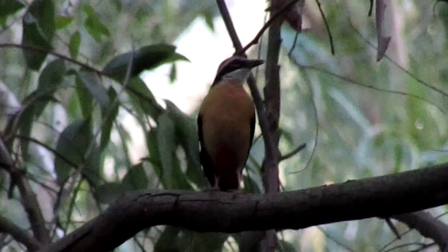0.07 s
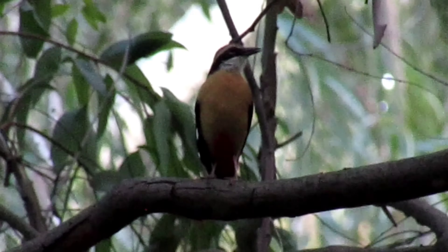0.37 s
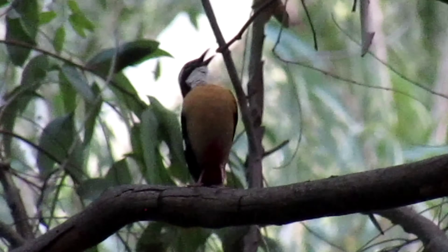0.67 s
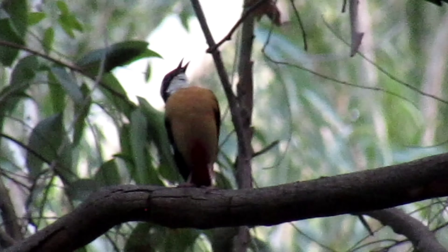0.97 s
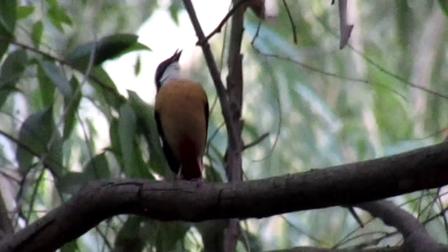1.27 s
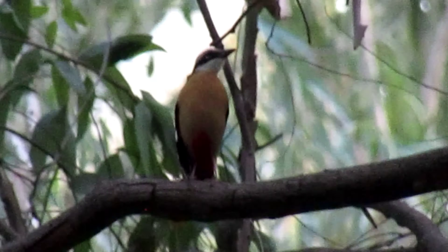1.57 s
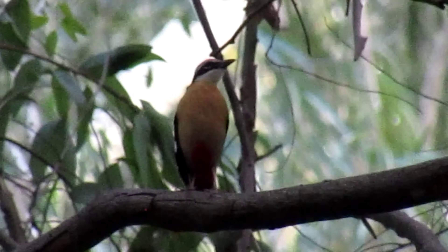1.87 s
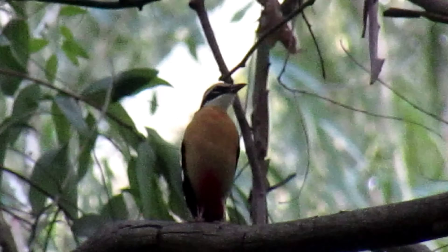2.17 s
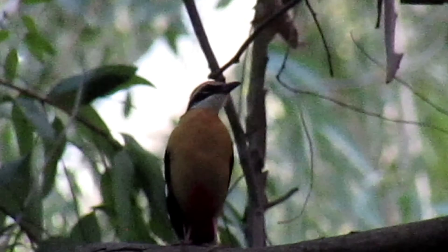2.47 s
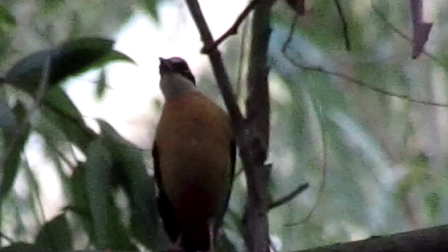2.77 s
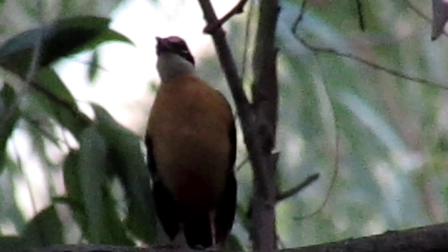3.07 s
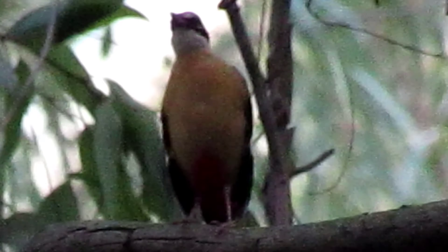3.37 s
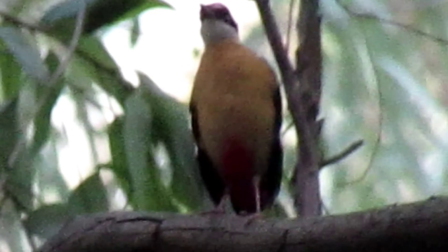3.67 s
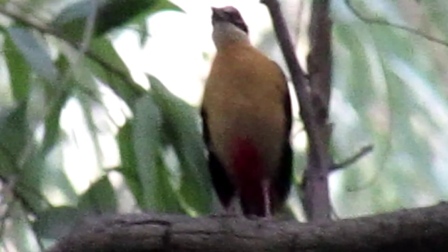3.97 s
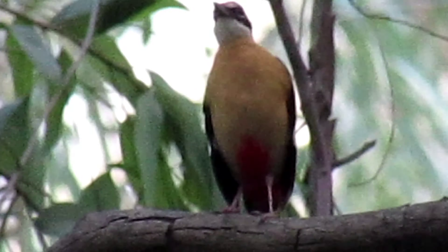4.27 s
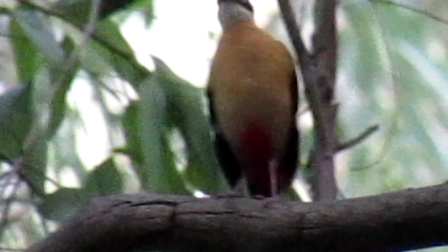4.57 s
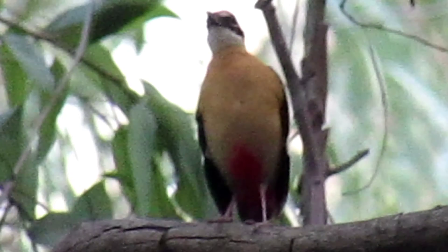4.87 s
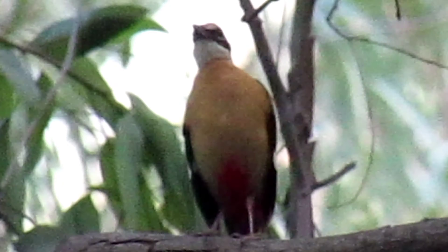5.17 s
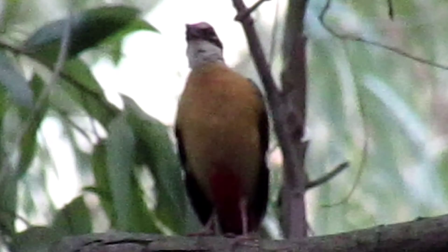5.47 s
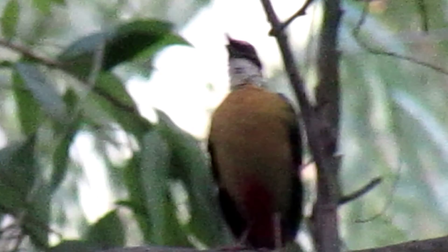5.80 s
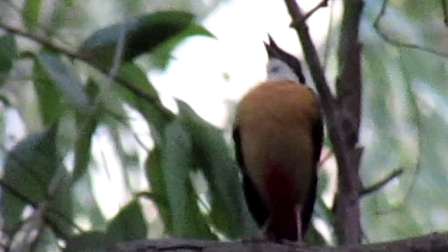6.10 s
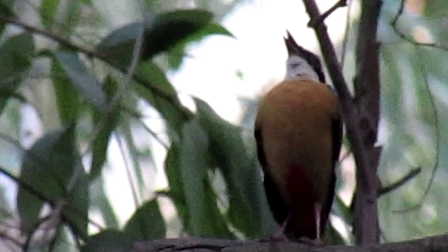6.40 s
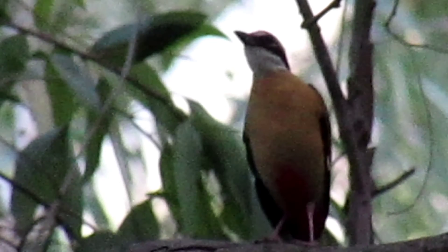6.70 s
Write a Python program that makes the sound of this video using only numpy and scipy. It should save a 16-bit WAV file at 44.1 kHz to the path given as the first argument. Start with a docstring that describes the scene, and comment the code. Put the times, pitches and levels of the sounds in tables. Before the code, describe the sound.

A forest bird whistles a two-note call twice over trilling, chirping crickets, with faint distant birds in between.

```python
"""Crickets trill over a low forest hush, wing file on scraper; slower ones soon chirp along.
A pitta on a branch whistles two calls from its syrinx, each a rising and an arched note, which ring on
among the trees. Between them a second pitta gives the same call from far off, among other birds,
and the hand-held mono camera takes a few light knocks that ring its body."""
import sys
import numpy as np
from scipy import signal
from scipy.fft import rfft
from scipy.io import wavfile
from scipy.ndimage import uniform_filter1d

SR = 44100
rng = np.random.default_rng(int(sys.argv[2]) if len(sys.argv) > 2 else 0)


def master_out(mix):
    """Clip the mix to full scale and print it as 16-bit PCM to the path in sys.argv[1]."""
    frames = np.transpose(np.atleast_2d(mix))
    ceiling = np.clip(frames, -1, 1)
    pcm = np.round(ceiling * 32767).astype(np.int16)
    wavfile.write(sys.argv[1], SR, pcm)


N = 297234
T = np.arange(N) / SR

# Noise spectra. Each row: frequency in Hz, relative density in dB.
HUSH_SPECTRUM = [(20, -10.5), (50, -2.5), (130, 1), (300, 0), (600, -3.5), (1200, -6.5), (2200, -9.5),
                 (4000, -10.5), (7500, -14.5), (8700, -12), (11500, -15.5), (13200, -18), (15000, -14.5)]
INSECT_CHORUS_SPECTRUM = [(3500, -65), (4800, -17.5), (5300, -3.5), (5800, 1.5), (6150, 2.5), (6550, -6.5),
                          (6900, -3.5), (7250, -13), (7700, -11), (9000, -45)]
PITTA_HISS_SPECTRUM = [(2800, -15), (4200, -0.5), (7000, -4), (9000, 8), (10800, -1), (12300, 1.5),
                       (15000, -6)]
CRY_SPECTRUM = [(1400, -28), (1850, -12), (2060, 3), (2350, -9), (3200, -17), (4200, -3), (5000, -2),
                (6500, -30), (8500, -7), (10500, -30)]
# Bouts of the nearest fast cricket. Each row: start in seconds, end in seconds, peak level in dB.
TRILL_BOUTS = [(.008, .09, -41.5), (0.605, .89, -42.5), (1.467, 1.763, -40.5), (2.361, 2.55, -43),
               (3.25, 3.432, -45), (4.106, 4.29, -45), (4.77, 4.971, -43.5), (5.43, 5.717, -42.5),
               (6.212, 6.5, -44)]
# Distant whistles. Each row: start and length in seconds, start and end pitch in Hz, level in dB.
SHORT_WHISTLES = [(0, 0.15, 3155, 3000, -63.5), (0.258, .16, 3880, 3500, -67), (1.14, 0.1, 1167, 1157, -64),
                  (3.505, 0.15, 3830, 3480, -65), (4.9, 0.172, 1686, 1590, -67),
                  (5.05, 0.1, 1118, 1176, -64.5), (5.303, 0.091, 2995, 3020, -53.5)]
# Pitch contours of the near pitta. Each row: time into the note in seconds, pitch in Hz.
RISE_CONTOUR = [(0, 1903), (.025, 2087), (.04, 2357), (.06, 2550), (.09, 2635), (.16, 2756), (.208, 2990),
                (.226, 2919), (.246, 2400)]
ARCH_CONTOUR = [(0, 2430), (.048, 2355), (.059, 2492), (.067, 2906), (.097, 3019), (.132, 2822),
                (.172, 2705), (.186, 2293), (.232, 2203)]
# Its notes. Each row: start in seconds, time stretch, pitch factor, level in dB, overtone gain in dB.
RISING_NOTES = [(.64, 0.97, .995, -32, 5), (5.817, 0.95, 1.005, -32.5, 6.5)]
ARCHED_NOTES = [(1.098, 1.0, .997, -34, 5.9), (6.279, 1.02, 1.0, -33.5, 5.3)]
# Syrinx rasp. Each row: offset from the tone in Hz, relative density in dB.
RASP_SPECTRUM = [(20, 11), (150, 1), (300, -4.5), (500, -15.5), (900, -27), (2000, -58)]
# Throat and open beak as an overtone filter. Each row: frequency in Hz, gain in dB.
BEAK_RESPONSE = [(4400, -39), (4850, -25.5), (5400, -27.5), (6100, -28), (7200, -28), (8100, -20),
                 (8800, -15.5), (9400, -22), (10300, -37), (11000, -30), (11900, -23), (13000, -29.5),
                 (14200, -27.5), (15200, -26.5)]
# Chirps of two slow crickets. Each row: start in seconds, end in seconds.
NEAR_CHIRPS = [(.81, 1.182), (1.965, 2.331), (3.11, 3.435), (4.185, 4.553)]
FAR_CHIRPS = [(.7, 1.05), (2.1, 2.25), (5.1, 5.5), (6.27, 7)]
# Tiny bird chips. Each row: start in seconds, start pitch in Hz, peak level in dB.
BIRD_CHIPS = [(1.774, 11000, -53), (2.165, 10800, -53), (2.352, 11100, -51), (2.82, 6320, -42.5),
              (2.847, 6200, -45), (2.863, 10800, -47.5), (2.88, 11200, -47), (2.972, 11200, -48)]
# Knocks. Each row: start in seconds, level in dB, scrape decay in seconds, low and high edge in Hz.
CAMERA_KNOCKS = [(1.894, -43.5, 0.011, 740, 1730), (2.879, -52, 0.0067, 500, 1500),
                 (3.195, -51, 0.012, 120, 600), (3.864, -42, 0.015, 141, 4150),
                 (3.934, -54, 0.17, 160, 1260), (3.967, -48.5, 0.0067, 400, 4000),
                 (4.016, -48, 0.0035, 403, 2000), (4.084, -53, 0.0045, 1800, 5000)]
# Camera body modes. Each row: frequency in Hz, width in Hz, gain in dB.
BODY_MODES = [(160, 67, 1), (358, 130, 5), (516, 90, -1), (733, 190, 5), (863, 51, 4), (1090, 39, 4),
              (1550, 730, -1.5), (2010, 260, 1), (2650, 380, 1.5), (3990, 500, 0), (4600, 230, -1.5),
              (6400, 3000, -2), (8200, 1500, -6)]
# Far pitta. Each row: start and length in seconds, start and goal pitch in Hz, start level in dB,
# swell in dB per second.
FAR_PITTA_NOTES = [(2.33, 0.28, 1906, 2903, -58.5, 36), (2.944, 0.22, 2938, 2536, -49.5, -12)]


def undb(db):
    return 10 ** (np.asarray(db) / 20)


def unit(x):
    return x / np.sqrt(np.mean(x ** 2))


def ramp(x):
    return np.clip(x, 0, 1)


def db_at(hz, points):
    """Read (Hz, dB) points on a log-frequency axis."""
    f, db = np.transpose(points)
    return np.interp(np.log(np.maximum(hz, 1)), np.log(f), db)


def noise(spectrum):
    """Shaped noise, rms 1."""
    gain = undb(db_at(np.fft.rfftfreq(N, 1 / SR), spectrum))
    return unit(np.fft.irfft(rfft(rng.standard_normal(N)) * gain, N))


def walk(rate_hz):
    """Smooth random wander, rms 1."""
    k = max(int(SR / rate_hz), 1)
    return unit(uniform_filter1d(np.repeat(rng.standard_normal(N // k + 1), k)[:N], k))


def cycles(hz):
    return np.cumsum(hz) / SR


def sine(hz):
    return np.sin(2 * np.pi * cycles(hz))


def gate(start_s, end_s, edge_s):
    return ramp(np.minimum(T - start_s, end_s - T) / edge_s)


def arc(start_s, length_s):
    return np.sin(np.pi * ramp((T - start_s) / length_s))


def forest_echo(x, early_db, late_db, t60_s, early_s=.035):
    """Single returns from near trunks, then a long scatter from foliage."""
    t = T[:int(1.5 * SR)]
    trunks = np.zeros(len(t))
    delays_s = np.linspace(.006, 2 * early_s, num=14) + rng.uniform(0, 0.0045, size=14)
    trunks[(delays_s * SR).astype(int)] = rng.choice([-1, 1], size=14) * np.exp(-delays_s / early_s)
    leaves = rng.standard_normal(len(t)) * undb(-60 * t / t60_s) * (1 - np.exp(-t / 0.017))
    early = undb(early_db) * trunks / np.linalg.norm(trunks)
    late = undb(late_db) * leaves / np.linalg.norm(leaves)
    return signal.fftconvolve(x, early + late)[:N]


def hush(hush_db=-53.5, whine_hz=11793, whine_db=-71):
    """Far air and foliage, microphone hiss and a thin wavering whine."""
    whine = np.sqrt(2) * sine(whine_hz * (1 + 0.00354 * walk(250)))
    air = noise(HUSH_SPECTRUM) * undb(hush_db + 0.093 * walk(1.7))
    return air + whine * undb(whine_db + 2 * walk(30))


def wing_strokes(strokes, hz, fall, duty):
    """Each wing closing draws the file over the scraper: a short falling tone."""
    progress = np.minimum(strokes % 1 / duty, 1)
    return np.abs(np.sin(np.pi * progress)) ** 0.41 * sine(hz * (1 - fall * (progress - .5)))


def cricket_trills(rate_hz=91, pitch_hz=6020, burst_s=0.096, dip=0.82, neighbours_db=-59, chorus_db=-56):
    """One fast cricket trills in bouts of bursts; its neighbours and a far chorus never stop."""
    bouts, neighbours = np.zeros((2, N))
    for start_s, end_s, db in TRILL_BOUTS:
        bursts = 1 - dip * np.cos(np.pi * (T - start_s) / burst_s) ** 2
        bouts += gate(start_s, end_s, 0.016) * undb(db) * bursts
    strokes = cycles(rate_hz * (1 + 0.024 * walk(25)))
    near = bouts * wing_strokes(strokes, pitch_hz * (1 + .006 * walk(90)), fall=.11, duty=0.45)
    for stroke_hz, hz in [(88, 5650), (95, 5900), (100, 6100)]:
        gain = undb(6 * walk(9))
        strokes = cycles(stroke_hz * (1 + .03 * walk(15)))
        neighbours += gain * wing_strokes(strokes, hz * (1 + .015 * walk(60)), fall=.13, duty=.5)
    chorus = noise(INSECT_CHORUS_SPECTRUM) * undb(chorus_db + 2.5 * walk(3.56))
    return near + undb(neighbours_db) * unit(neighbours) + chorus


def short_whistles(drift):
    """Distant birds whistle faint, straight glides."""
    out = np.zeros(N)
    for start_s, length_s, from_hz, to_hz, db in SHORT_WHISTLES:
        hz = np.interp(T, [start_s, start_s + length_s], [from_hz, to_hz])
        out += arc(start_s, length_s) * undb(db) * sine(hz * drift)
    return out


def far_birds():
    """All distant birds; whistles and chips echo among the trees."""
    drift = 1 + 0.00371 * walk(120)
    whistles = short_whistles(drift) + far_pitta(drift) + long_whistle(drift)
    chips = bird_chips()
    return (whistles + chips + hoarse_cry()
            + forest_echo(whistles, early_db=-3.5, late_db=0, t60_s=1.45)
            + forest_echo(chips, early_db=-7, late_db=-12, t60_s=.6))


def note(contour, row, attack_s, release_s, sag_db_per_s, accent_s, accent_db,
         settle_s, break_s, open_s, shut_db, fade_db=25, leap_hz_per_s=25000):
    """Control curves of a note that swells, sags, gets a late push and dies. Times are pre-stretch."""
    start_s, stretch, pitch_factor, level_db, overtone_db = row
    times_s, pitches_hz = np.transpose(contour)
    age_s = np.clip((T - start_s) / stretch, 0, times_s[-1])
    left_s = times_s[-1] - age_s
    sounding = gate(start_s, start_s + times_s[-1] * stretch, .003)
    hz = np.interp(age_s, times_s, pitches_hz)
    fade = ramp(1 - age_s / attack_s) + ramp(1 - left_s / release_s)
    accent = np.exp(-((age_s - accent_s) / 0.01) ** 2)
    db = level_db - fade_db * fade - sag_db_per_s * age_s + accent_db * accent
    # Raspy until the syrinx settles, and again as it breaks off.
    rough = ramp(0.0072 + 0.75 * ramp((settle_s - age_s) / 0.014) + 0.79 * ramp(1 - left_s / break_s))
    # Overtones need a clean, steady tone and an open beak.
    leap = uniform_filter1d(ramp(np.abs(np.gradient(hz)) * SR / leap_hz_per_s) ** 2, size=256)
    bright_db = overtone_db - 9 * rough - 9 * leap + shut_db * ramp(1 - age_s / open_s)
    return sounding, hz * pitch_factor, db, bright_db, rough


def rising_note(row):
    """Starts hard through a half-shut beak, ends on an accent."""
    return note(RISE_CONTOUR, row, attack_s=0.033, release_s=0.0068, sag_db_per_s=23.5,
                accent_s=0.233, accent_db=8, settle_s=0.065, break_s=0.043, open_s=.13, shut_db=-18)


def arched_note(row):
    """Swells and fades more gently."""
    return note(ARCH_CONTOUR, row, attack_s=0.041, release_s=0.027, sag_db_per_s=25.5,
                accent_s=0.181, accent_db=5.5, settle_s=.052, break_s=0.087, open_s=0.037, shut_db=-6)


def near_pitta(flutter_hz=175, rasp_db=-4, hiss_db=-14.5, flicker_db=4, beam_hz=2800, air_cut_hz=12500):
    """The syrinx gives a near-pure tone, raspy at a note's ends; the beak colours its overtones."""
    tone, treble, beam = np.zeros((3, N))
    flutter = sine(flutter_hz * (1 + 0.1588 * walk(90)))
    drift = .0026 * walk(300)
    flickers = [undb(flicker_db * walk(130)) for _ in range(5)]
    rasp = noise(RASP_SPECTRUM) + 1j * noise(RASP_SPECTRUM)
    hiss = noise(PITTA_HISS_SPECTRUM)
    for sounding, *curves in [*map(rising_note, RISING_NOTES), *map(arched_note, ARCHED_NOTES)]:
        on = sounding > 0
        hz, db, bright_db, rough = (curve[on] for curve in curves)
        # A slack membrane flutters, shaking pitch and level.
        phase = 2 * np.pi * cycles(hz * (1 + drift[on] + 0.013 * rough ** 2 * flutter[on]))
        swell = np.sqrt(2) * sounding[on] * undb(db) * (1 - 0.22 * rough * flutter[on])
        # Its irregular motion spreads noise around the tone.
        spread = 1 - 0.4 * rough + undb(rasp_db) * rough * rasp[on]
        tone[on] = swell * np.imag(np.exp(1j * phase) * spread)
        overtones = sum(flicker[on] * undb(db_at(k * hz, BEAK_RESPONSE)) * np.sin(k * phase)
                        for k, flicker in enumerate(flickers, 2))
        treble[on] = swell * undb(bright_db) * (overtones + undb(hiss_db) * rough ** 0.49 * hiss[on])
        # The raised beak beams high pitches into the canopy: more echo.
        beam[on] = (hz / beam_hz) ** 3
    # Air and leaves absorb the echo's top overtones.
    softened = signal.sosfilt(signal.butter(3, air_cut_hz, fs=SR, output="sos"), beam * treble)
    return (tone + treble + forest_echo(beam * tone, early_db=-3.5, late_db=-6.5, t60_s=1.12)
            + forest_echo(softened, early_db=-4.5, late_db=-2.5, t60_s=0.75))


def slow_cricket(chirps, pitch_hz, db, rate_hz=46.4, swell_s=0.086):
    """Each chirp swells and climbs to pitch over its first strokes, and ends on a whole one."""
    out = np.zeros(N)
    drift = 1 + 0.00174 * walk(100)
    for start_s, end_s in chirps:
        effort = ramp((T - start_s) / swell_s)
        hz = pitch_hz * drift * (1 - .025 * (1 - effort))
        tone = wing_strokes((T - end_s) * rate_hz + .8, hz, fall=0.0099, duty=0.66)
        out += np.sqrt(2) * undb(db) * effort * gate(start_s, end_s, 0.0026) * tone
    return out


def cricket_chirps():
    """Two slow crickets in the undergrowth, with a short echo."""
    near = slow_cricket(NEAR_CHIRPS, pitch_hz=6920, db=-46)
    far = slow_cricket(FAR_CHIRPS, pitch_hz=7200, db=-63)
    return near + far + forest_echo(near + far, early_db=-30, late_db=-12, t60_s=0.1)


def bird_chips(length_s=0.0113, fall=0.166):
    """Tiny, high, falling tones."""
    out = np.zeros(N)
    progress = np.linspace(0, 1, int(length_s * SR))
    for start_s, hz, db in BIRD_CHIPS:
        chip = np.sin(np.pi * progress) * sine(hz * (1 - fall * progress))
        first = int(start_s * SR)
        out[first:first + len(chip)] += undb(db) * chip
    return out


def camera_knocks(attack_s=0.0023):
    """A finger knocks and scrapes: a dying run of tiny slips rings the camera body."""
    out = np.zeros(N)
    t = T[:int(.25 * SR)]
    for start_s, db, decay_s, low_hz, high_hz in CAMERA_KNOCKS:
        slips = rng.standard_normal(len(t)) * undb(8.2 * rng.standard_normal(len(t)))
        scrape = signal.lfilter(*signal.butter(1, [low_hz, high_hz], "band", fs=SR), slips)
        scrape *= np.exp(-t / decay_s) * (1 - np.exp(-t / attack_s))
        ring = sum(undb(gain_db) * signal.lfilter(*signal.iirpeak(hz, hz / width_hz, fs=SR), scrape)
                   for hz, width_hz, gain_db in BODY_MODES)
        first = int(start_s * SR)
        out[first:first + len(t)] += undb(db) * ring / np.linalg.norm(ring) * np.sqrt(decay_s * SR)
    return out


def far_pitta(drift, glide_s=0.094, flutter_db=2.5):
    """Distance leaves only the pure, fluttering tone: one note climbs, one sinks."""
    out = np.zeros(N)
    for start_s, length_s, from_hz, goal_hz, db, swell_db_per_s in FAR_PITTA_NOTES:
        age_s = np.clip(T - start_s, 0, length_s)
        hz = goal_hz + (from_hz - goal_hz) * np.exp(-age_s / glide_s)
        swell = gate(start_s, start_s + length_s, 0.019) * undb(db + swell_db_per_s * age_s)
        out += swell * sine(hz * drift)
    return out * undb(flutter_db * walk(60))


def long_whistle(drift, start_s=2.76, length_s=.5, top_hz=2560, scoop_s=.022, fade_db_per_s=16):
    """A fading whistle with a strong octave: scoops up, then sinks ever faster."""
    age_s = np.clip(T - start_s, 0, length_s)
    hz = top_hz * drift * (1 - .12 * np.exp(-age_s / scoop_s) - .19 * (age_s / length_s) ** 2)
    fade = gate(start_s, start_s + length_s, 0.012) * undb(-fade_db_per_s * age_s)
    return fade * (undb(-60) * sine(hz) + undb(-57) * sine(2 * hz))


def hoarse_cry(start_s=4.26, length_s=0.69, db=-59):
    """A distant bird's cry: one swell of shaped noise."""
    return arc(start_s, length_s) * undb(db) * noise(CRY_SPECTRUM)


def scene():
    mono = near_pitta() + far_birds() + cricket_trills() + cricket_chirps() + camera_knocks() + hush()
    return np.array([mono, mono])


def record(dry, notch_hz=7880, notch_q=28, top_hz=15150):
    """The camera has a narrow treble dip and cuts the top."""
    notched = signal.lfilter(*signal.iirnotch(notch_hz, notch_q, fs=SR), dry)
    return signal.sosfilt(signal.ellip(12, .1, 70, top_hz, fs=SR, output="sos"), notched)


dry = scene()
out = record(dry)
master_out(out)
```